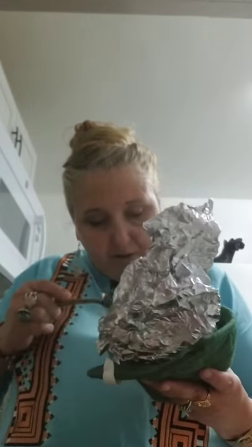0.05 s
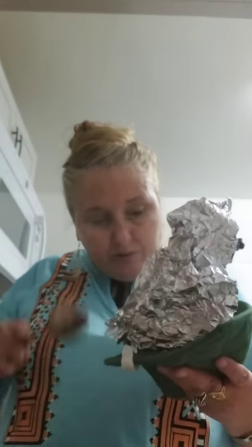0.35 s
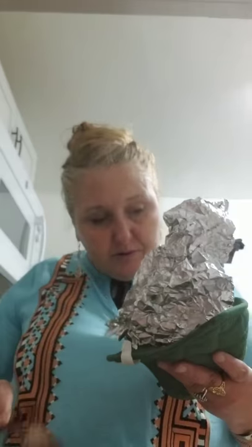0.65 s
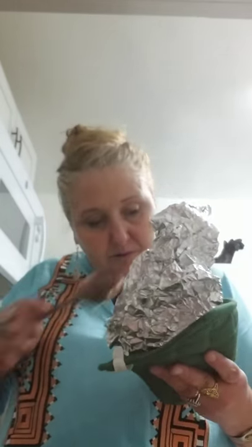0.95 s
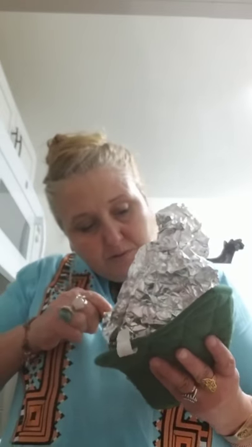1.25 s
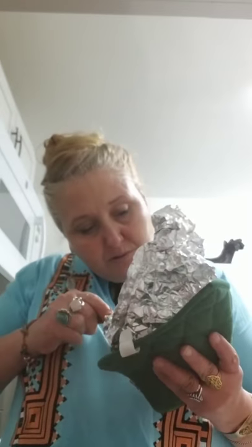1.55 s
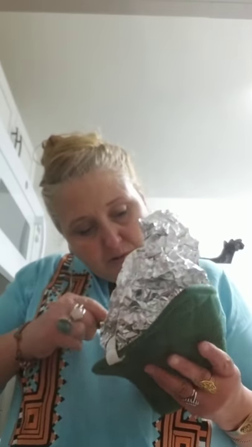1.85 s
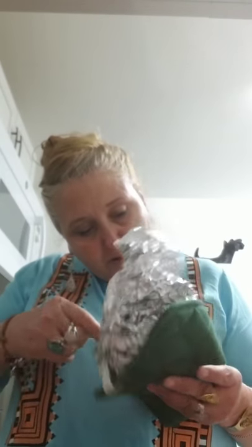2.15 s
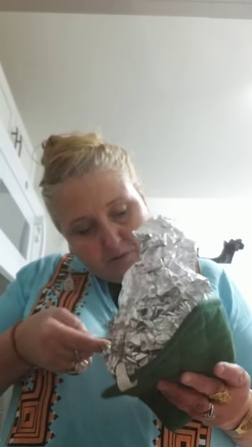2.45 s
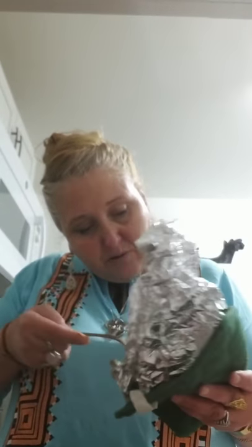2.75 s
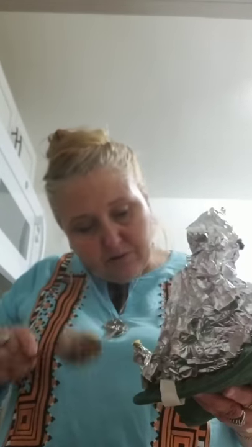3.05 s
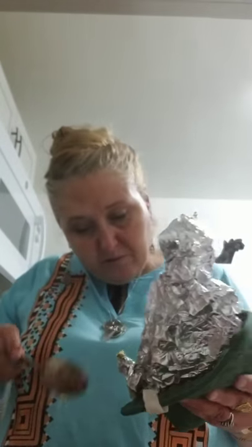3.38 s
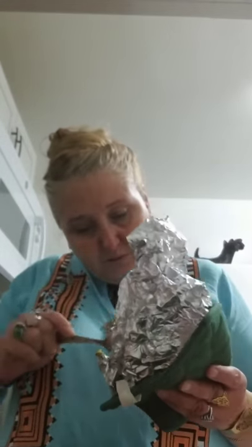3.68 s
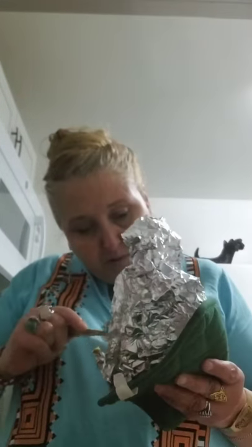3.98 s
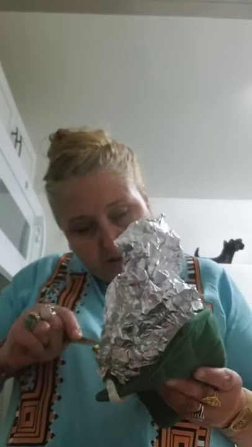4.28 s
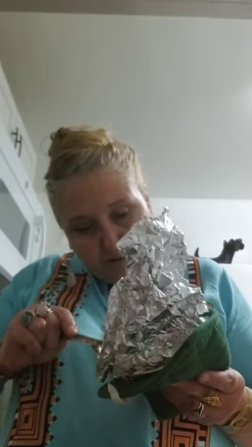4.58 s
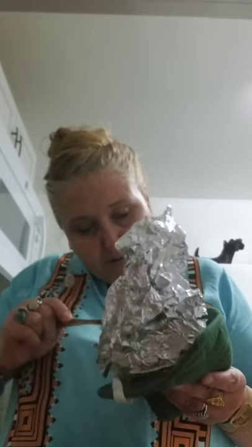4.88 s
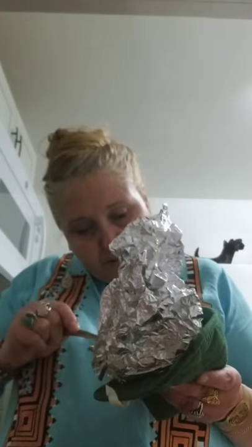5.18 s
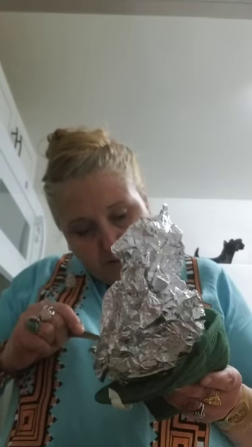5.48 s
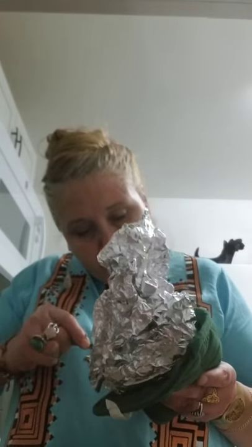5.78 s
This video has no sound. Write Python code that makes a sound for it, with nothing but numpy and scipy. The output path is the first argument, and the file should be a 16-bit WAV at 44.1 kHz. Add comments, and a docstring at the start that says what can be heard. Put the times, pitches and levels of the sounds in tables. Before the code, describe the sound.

Two loud, ringing knocks of a spoon on a metal pot follow a brief scrape. Close to the microphone, the spoon then scoops soft squash out of its skin in short, quiet, wet strokes, its edge ticking and the foil wrapping crackling faintly. One more knock rings out, then the digging gets firmer, with one tiny squeak. An appliance hums low throughout in the small, hard-walled kitchen.

```python
"""A small hard-walled kitchen, a stereo microphone close to a roasted squash in its foil-wrapped skin.
Over an appliance's steady hum, a spoon digs into the soft flesh with a wet rasp and a few foil crackles.
Further off, the spoon is knocked clean twice on a ringing metal pot; the recorder's gain dips and slowly
recovers, heard in the hum. The digging goes on, the spoon's edge catching with a tick as strokes begin.
A third knock comes just after three seconds, then firmer strokes and one squeak of metal on the skin."""
import sys
import numpy as np
from scipy import signal
from scipy.fft import rfft, irfft, next_fast_len
from scipy.io import wavfile

SR = 44100
rng = np.random.default_rng(int(sys.argv[2]) if len(sys.argv) > 2 else 0)


def materialize(psi):
    """Save the field psi as 16-bit PCM at rate SR to the path in sys.argv[1].

    A 1-D psi becomes a single channel; in a 2-D psi each row is a channel.
    """
    bounded = np.clip(np.atleast_2d(psi).T, -1, 1)
    quanta = np.round(bounded * 32767).astype(np.int16)
    wavfile.write(sys.argv[1], SR, quanta)


N = 265923
TIME = np.arange(N) / SR

# The appliance's motor tones: (frequency [Hz], level with the recorder's gain at rest [dB])
HUM_TONES = [(48.5, -58), (59.3, -49.5), (119, -57), (145.5, -62.5), (200, -66), (295, -64.5), (342, -68.5),
             (446, -70)]
# Its rush of air: (frequency [Hz], relative level [dB])
AIR_SPECTRUM = [(20, -24), (42, 2.5), (90, -8), (150, -7.5), (300, -13), (430, -13), (620, -25.5),
                (860, -23.5), (1400, -35), (1750, -38), (2300, -47), (8000, -51), (13000, -47.5)]
# The recorder's gain, heard in the background hum: (time [s], relative level [dB])
RECORDER_GAIN = [(0.0, -40.5), (0.35, -40.5), (0.97, -57), (1.45, -59.5), (2.9, -53.5), (3.35, -48),
                 (5.33, -48.5), (6.03, -41.5)]
# Spoon strokes through the flesh: (time [s], swell [s], length [s], rasp level [dB], fizz level [dB])
STROKES = [(0.0, 0.0037, 0.038, -49.5, -62.5), (0.982, 0.0076, .045, -65, -71.5),
           (1.184, .01, 0.021, -67, -70.5), (1.384, 0.0097, 0.068, -58, -68),
           (1.608, .022, 0.06, -62.5, -73), (1.732, 0.017, 0.045, -54, -61.5),
           (1.817, 0.038, 0.059, -59.5, -66), (1.906, 0.01, 0.067, -58.5, -69),
           (2.114, .055, 0.09, -56, -66), (2.373, 0.069, 0.069, -59, -67), (2.556, 0.062, 0.051, -64, -74),
           (2.651, .018, 0.052, -63, -71), (2.758, 0.0087, 0.021, -53.5, -46),
           (2.901, 0.013, 0.074, -64, -68.5), (3.39, .02, 0.099, -56.5, -58.5),
           (3.665, 0.069, .088, -46.5, -48.5), (3.927, .02, 0.056, -54.5, -59),
           (4.104, 0.023, 0.03, -47.5, -51), (4.27, 0.031, 0.085, -50.5, -50.5),
           (4.44, 0.042, 0.087, -46.5, -48), (4.595, 0.057, .11, -56.5, -55.5),
           (4.835, 0.012, 0.036, -49.5, -52.5), (4.973, .015, 0.053, -65, -67.5),
           (5.184, 0.017, 0.04, -52, -57), (5.558, 0.033, 0.035, -57, -69), (5.81, 0.023, 0.07, -51, -60),
           (5.981, .012, 0.026, -60, -55)]
# Tearing fibres: (frequency [Hz], relative level [dB])
RASP_SPECTRUM = [(200, -18), (400, 3), (650, -5), (1000, -0.5), (1500, 1), (1850, -4.5), (2400, 0),
                 (3300, -5.5), (4600, -10), (7000, -13.5), (12000, -33.5)]
# Wet flesh: (frequency [Hz], relative level [dB])
FIZZ_SPECTRUM = [(1500, -28.5), (3500, -7), (5500, -2.5), (7500, -0.5), (9500, -3), (12500, 0.5),
                 (16000, -3)]
# The spoon rubs inside the skin: (start [s], end [s], rasp level [dB], fizz level [dB])
RUBS = [(0.0, 0.1, -62.5, -71), (1.799, 2.622, -65.5, -73), (3.78, 4.897, -63, -68), (5.5, 6.032, -61, -67)]
# The spoon's edge catching, and a few foil crackles: (time [s], relative level [dB], treble offset [dB])
EDGE_TICKS = [(0.1854, -55, 0), (0.3057, -57, 2), (0.3526, -58, -0.5), (1.3935, -53, -24),
              (1.6262, -47, -17), (1.745, -42, -26), (1.821, -38, -28), (1.8448, -31, -29),
              (1.917, -32.5, -26), (2.1288, -35, -17), (2.4283, -34, -19), (2.7642, -42.5, -3),
              (3.669, -41, -2.5), (4.119, -23, -19.5), (4.592, -44, 4), (4.8502, -25.5, -17.5),
              (5.1844, -43, -4), (5.817, -37, -21), (5.9918, -45, -5.5)]
# Spoon on the rim: (time [s], spot [0 = A, 1 = B], ring level [dB], clash level [dB],
# clash tilt [dB/octave], thud level [dB], chatter [s])
KNOCKS = [(0.4124, 0.16, -1.5, -20, 0.5, -20.5, .03), (0.6446, 0.31, -8, -20, 1.5, -20.5, 0.018),
          (3.1295, 0.82, 0.5, -18, 0, -17, 0.0043)]
# Dense, quickly dying pot modes: (centre [Hz], width [Hz], level at spot A [dB], level at spot B [dB])
CLASH_CLUSTERS = [(910, 350, -5, -5), (1414, 170, -10, -4), (2410, 610, -8, 0.5), (3200, 140, -1, -8),
                  (3920, 290, -6, -2.5), (4400, 490, -2.5, 2.5), (4870, 790, 1.5, -8.5),
                  (6080, 730, -4, -8), (7115, 630, -5.5, -4.5), (10440, 1800, -13.5, -18.5),
                  (12110, 380, -6, -20.5), (14600, 1200, -14, -24), (9000, 7100, -27, -17.5)]
# The counter's thud: (frequency [Hz], relative level [dB])
THUD_SPECTRUM = [(25, -31.5), (45, -15.5), (75, -12), (108, 2), (195, -13), (290, 1), (400, -7.5),
                 (520, -4.5), (700, -21.5), (1500, -37.5)]
# Modes of pot and counter: (frequency [Hz], t60 [s], level at spot A [dB], level at spot B [dB])
POT_MODES = [(114, 0.3, -13, -15), (155, 0.33, -24, -13), (286, 0.5, -21, -17), (318, 0.35, -26, -19),
             (388, 0.35, -35, -25), (500, 0.3, -25, -31), (560, 0.38, -33, -24), (841, 0.48, -33, -19),
             (921, 0.47, -34, -26), (956, 1.0, -42, -52), (1002, 1.3, -33, -53), (1011, 1.3, -33, -53),
             (1497, 0.38, -23, -32), (2014, 1.15, -39, -58), (2036, 1.15, -42, -60), (2070, 0.31, -19, -19),
             (2256, 0.55, -37, -31), (2305, 0.48, -28, -25), (2347, 0.8, -34, -42), (2372, 0.5, -32, -29),
             (2475, 0.28, -17, -15), (2672, 0.4, -33, -24), (2707, 0.24, -24, -20), (3168, 0.36, -22, -35),
             (4478, 0.4, -27, -31), (4595, 0.28, -25, -29), (4680, 0.3, -28, -32), (4950, 0.28, -24, -30),
             (5013, 0.25, -18, -33), (5573, 0.2, -23, -41)]
# Decay of clash, thud and room: (frequency [Hz], t60 [s])
DECAY_TIMES = [(60, 0.22), (300, 0.32), (1000, 0.28), (2400, 0.34), (4600, 0.3), (7200, 0.27),
               (10000, 0.24), (15000, 0.12)]
# Likeness of left and right for squash, foil and air: (frequency [Hz], coherence [-1 to 1])
COHERENCE = [(60, 0.94), (130, 0.63), (290, 1), (640, 0.38), (1400, 0.065), (3000, 0.026), (15000, 0.063)]
# The same for the knocks: (frequency [Hz], coherence [-1 to 1])
KNOCK_COHERENCE = [(60, 0.99), (130, 0.9), (290, 0.94), (640, .7), (1400, 0.18), (3000, -0.3),
                   (15000, 0.41)]
# The microphone's lean to the left: (frequency [Hz], left minus right [dB])
MIC_BALANCE = [(60, 2.5), (110, 1.5), (220, 3), (380, 3), (700, 3.5), (1300, 10.5), (2400, 4), (7000, 5.5),
               (15000, 2.5)]


def amp(db):
    """Decibels to gain."""
    return 10 ** (np.asarray(db) / 20)


def unit(x):
    """Scales to rms 1."""
    return x / np.sqrt(np.mean(x ** 2) + 1e-20)


def read(points, hz):
    """Reads a table on a log-frequency axis."""
    f, value = np.transpose(points)
    return np.interp(np.log(hz + 1), np.log(f + 1), value)


def add(mix, s, sound):
    """Mixes a stereo sound in at time s."""
    part = mix[:, max(round(s * SR), 0):][:, :sound.shape[1]]
    part += sound[:, :part.shape[1]]


def wander(n, step):
    """A random curve of rms about 1 that turns every step samples."""
    return np.interp(np.arange(n) / max(step, 1), np.arange(n + 2), rng.standard_normal(n + 2)) * 1.5 ** .5


def noise(n, spectrum, ripple_db=0, coherence=COHERENCE):
    """Stereo noise of rms 1, alike on both sides in the bass; ripple adds chance resonances."""
    size = next_fast_len(n)
    hz = np.fft.rfftfreq(size, 1 / SR)
    left, other = rfft(rng.standard_normal((2, size)))
    same = np.clip(read(coherence, hz), -1, 1)
    right = same * left + np.sqrt(1 - same ** 2) * other
    colour = amp(read(spectrum, hz) + ripple_db * wander(len(hz), 130 * size / SR))
    return unit(irfft(np.array([left, right]) * colour, size)[:, :n])


def fade(x, hold_s):
    """Holds a sound briefly, then lets every band die at its own rate."""
    hz, t, bands = signal.stft(x, SR, nperseg=256)
    decay = amp(-60 * np.maximum(t - hold_s, 0) / read(DECAY_TIMES, hz)[:, None])
    return signal.istft(bands * decay, SR, nperseg=256)[1][:, :x.shape[1]]


def appliance(air_db=-53):
    """Behind everything, wavering motor tones over a low rush of air."""
    hum = np.zeros(N)
    for hz, db in HUM_TONES:
        turns = hz * TIME + rng.random() + 0.11 * wander(N, .3 * SR)
        hum += amp(db) * np.sqrt(2) * np.sin(2 * np.pi * turns)
    return hum + amp(air_db) * noise(N, AIR_SPECTRUM)


def recorder_gain(rest_db=-48.5):
    """The recorder's gain dips after the first knocks and slowly recovers: a set curve for the hum."""
    return amp(np.interp(TIME, *np.transpose(RECORDER_GAIN)) - rest_db)


def grain(n, clump_db, slip_db=0):
    """Stick and slip, as a gain: millisecond bursts and the slower clumps they gather in."""
    slips = np.minimum(wander(n, .001 * SR), 2.4)
    clumps = wander(n, .009 * SR)
    return unit(amp(slip_db * slips + clump_db * clumps))


def crackle(n, per_s, spread_db):
    """Sparse pops of uneven size, each under a millisecond long, as a gain around 1."""
    pops = (rng.random(n) < per_s / SR) * amp(spread_db * np.minimum(rng.exponential(1, n), 3))
    return unit(1 + signal.lfilter([1], [1, -np.exp(-1 / (0.00022 * SR))], pops))


def spoon_strokes(bite_s=.007, release_s=.012):
    """Fibres tear and wet flesh pops under the spoon's edge: the rasp swells, eases and stops."""
    out, t = np.zeros((2, N)), np.arange(SR // 5) / SR
    for s, swell, length, rasp_db, fizz_db in STROKES:
        end = max(length, swell + .004)
        force = np.interp(t, [0, swell, end], [0.59, 1.46, 0.57])
        in_flesh = np.minimum(t / bite_s, 1) * np.exp(-np.maximum(t - end, 0) / release_s)
        rasp = amp(rasp_db - 1.5) * noise(len(t), RASP_SPECTRUM, ripple_db=3.0)
        fizz = amp(fizz_db - 0.95) * noise(len(t), FIZZ_SPECTRUM, ripple_db=2.5)
        texture = grain(len(t), clump_db=2.0) * crackle(len(t), per_s=190, spread_db=4.2)
        add(out, s, (rasp + fizz) * force * in_flesh * texture)
    return out


def spoon_rubbing(rise_s=.036, fall_s=.08, stir_db=-83.5):
    """Light, grainy contact while the spoon feels its way, over the faint stir of foil in the hand."""
    rasp = fizz = amp(stir_db)
    for start, end, rasp_db, fizz_db in RUBS:
        touch = np.clip((TIME - start) / rise_s, 0, 1) * np.exp(-np.maximum(TIME - end, 0) / fall_s)
        rasp = np.hypot(rasp, amp(rasp_db) * touch)
        fizz = np.hypot(fizz, amp(fizz_db) * touch)
    texture = grain(N, clump_db=1.45, slip_db=1.0) * crackle(N, per_s=53, spread_db=2.5)
    return (rasp * noise(N, RASP_SPECTRUM) + fizz * noise(N, FIZZ_SPECTRUM)) * texture


def foil_crackles(per_s=7.8, treble_db=-8):
    """The foil crackles faintly, by chance, while the spoon rubs: rows like those of EDGE_TICKS."""
    rows = []
    for s, end, rasp_db, _ in RUBS:
        for wait, extra_db in rng.exponential(1, (30, 2)):
            s += wait / per_s
            if s < end:
                rows.append((s, rasp_db + 10 + min(extra_db, 2), treble_db))
    return rows


def edge_ticks():
    """Sharp ticks of the spoon's edge catching as strokes begin, with a few foil crackles."""
    out, t = np.zeros((2, N)), np.arange(2048) / SR
    snap = np.exp(-t / 0.0039) * (1 - np.exp(-t / 0.00023))
    for s, db, treble_db in EDGE_TICKS + foil_crackles():
        body = amp(db - 12) * noise(len(t), RASP_SPECTRUM, ripple_db=0.5)
        treble = amp(db + treble_db + 0.5) * noise(len(t), FIZZ_SPECTRUM, ripple_db=1.0)
        add(out, s, (body + treble) * snap)
    return out


def clash_spectrum(spot, tilt_db):
    """The mode clusters that one blow excites, as (frequency [Hz], level [dB])."""
    hz = np.linspace(20, SR / 2, 500)
    power = sum(amp(a_db + spot * (b_db - a_db)) ** 2 * np.exp(-2 * ((hz - centre) / width) ** 2)
                for centre, width, a_db, b_db in CLASH_CLUSTERS)
    return np.column_stack([hz, 10 * np.log10(power + 1e-9) + tilt_db * np.log2(hz / 4000)])


def pot_ring(spot, rise_s=.0076):
    """The pot's modes, weighted by where the rim is struck; the close pairs beat."""
    out = np.zeros((2, 2 * SR))
    for hz, t60, a_db, b_db in POT_MODES:
        t = np.arange(int(t60 * SR)) / SR
        phase, side = rng.random(2)
        right_shift = np.arccos(read(KNOCK_COHERENCE, hz)) * np.sign(side - .5)
        tone = np.sin(2 * np.pi * (hz * t + phase) + np.array([[0], [right_shift]]))
        add(out, 0, amp(a_db + spot * (b_db - a_db) - 60 * t / t60) * tone)
    return out * (1 - np.exp(-np.arange(2 * SR) / SR / rise_s))


def pot_knocks():
    """The spoon chatters on the rim: a bright clash, a thud from the counter and the ring of the pot."""
    out, t = np.zeros((2, N)), np.arange(SR // 2) / SR
    attack = (1 + .7 * np.exp(-t / 0.027)) * (1 - np.exp(-t / 0.00049))  # first contact is the hardest
    slightly_left = amp([[.7], [-.7]])
    for s, spot, ring_db, clash_db, tilt_db, thud_db, chatter_s in KNOCKS:
        contact = attack * grain(len(t), clump_db=-1.8)
        metal = noise(len(t), clash_spectrum(spot, tilt_db), ripple_db=2.5, coherence=KNOCK_COHERENCE)
        clash = fade(metal, chatter_s) * contact * slightly_left
        counter = noise(len(t), THUD_SPECTRUM, coherence=KNOCK_COHERENCE)
        thud = fade(counter, hold_s=0.011) * (1 - np.exp(-t / 0.0043))
        add(out, s, amp(clash_db) * clash + amp(thud_db) * thud)
        add(out, s, amp(ring_db) * pot_ring(spot))
    return out


def spoon_squeak(start_s=4.762, length_s=.04, hz=2660, db=-58):
    """A short unsteady whistle of metal sliding on the squash's skin."""
    out, n = np.zeros((2, N)), int(length_s * SR)
    pitch = hz * (1 + 0.032 * wander(n, 180))
    tone = np.sin(2 * np.pi * np.cumsum(pitch) / SR) * np.hanning(n)
    add(out, start_s, amp(db) * np.array([tone, tone]))
    return out


def kitchen(x):
    """Dense reflections from cupboards and ceiling, from 4 ms behind the direct sound."""
    n = SR // 2
    taps = rng.standard_normal((2, n)) * (rng.random((2, n)) < .08) * (np.arange(n) > .004 * SR)
    tail = fade(taps, hold_s=0)
    return signal.fftconvolve(x, tail / np.linalg.norm(tail[0]), axes=1)[:, :N]


def scene():
    """The squash is held close to the microphone; the pot stands further off; the room answers both."""
    pot, hum = pot_knocks(), appliance() * recorder_gain()
    squash = spoon_strokes() + spoon_rubbing() + spoon_squeak() + edge_ticks()
    return squash + pot + kitchen(amp(-9) * squash + amp(-16) * pot) + hum


def record(dry):
    """The microphone hears more on the left, rounds off the loudest peaks and cuts the top treble."""
    lean_db = read(MIC_BALANCE, np.fft.rfftfreq(N, 1 / SR))
    sides = amp(np.array([lean_db, -lean_db]) / 2)
    heard = irfft(rfft(dry) * sides / np.sqrt(np.mean(sides ** 2, axis=0)), N)
    rounded = 1.214 * np.tanh(heard / 1.235)
    lowpass = signal.firwin(511, cutoff=16200, window=("kaiser", 9), fs=SR)
    return signal.oaconvolve(rounded, lowpass[None], "same")


dry = scene()
out = record(dry)
materialize(out)
```